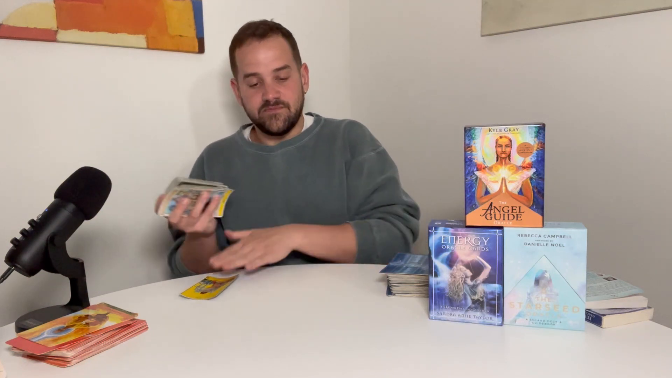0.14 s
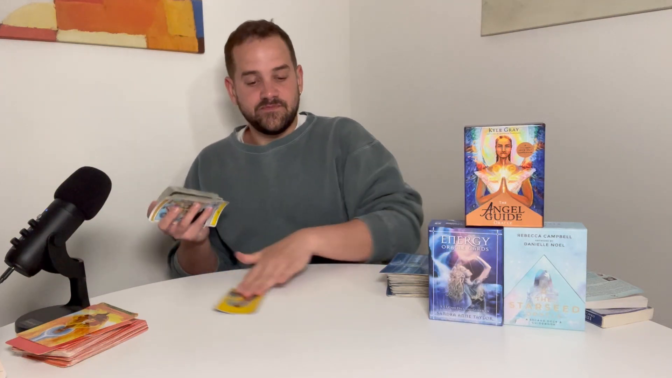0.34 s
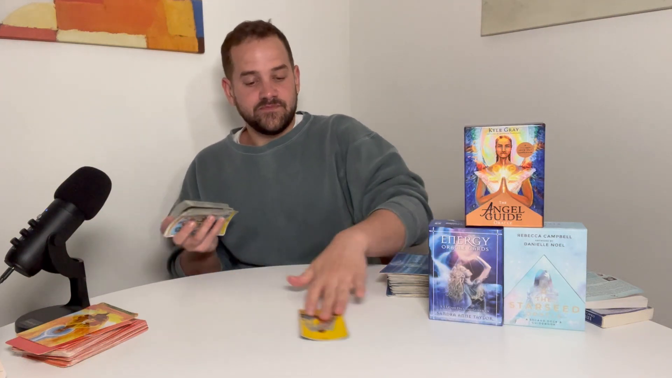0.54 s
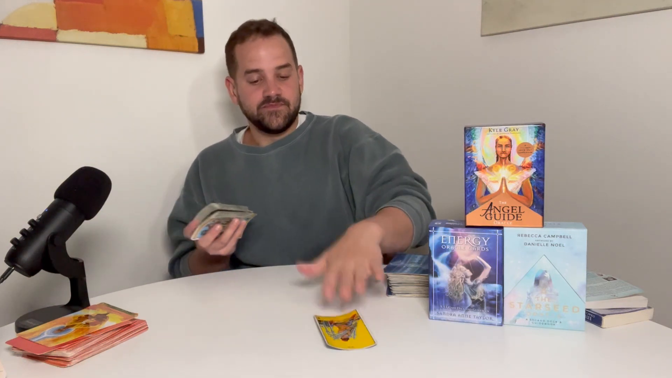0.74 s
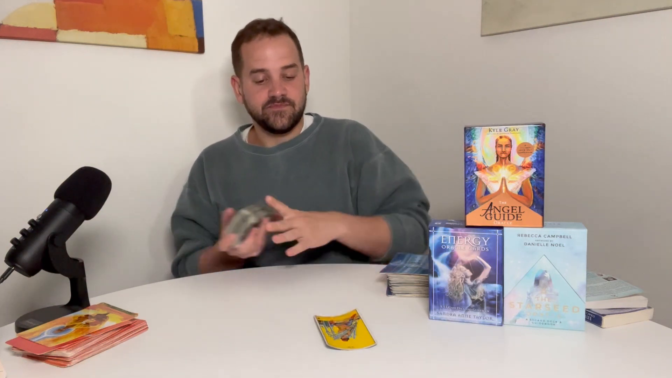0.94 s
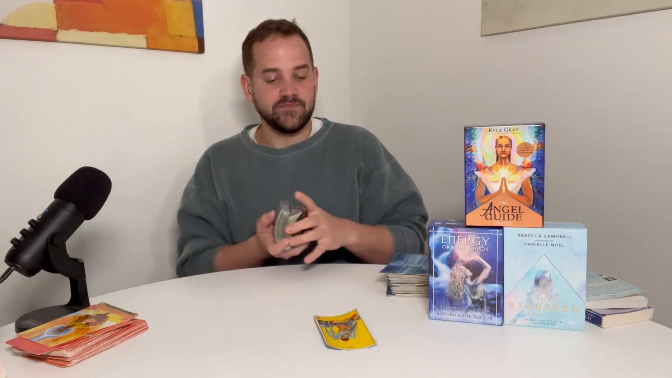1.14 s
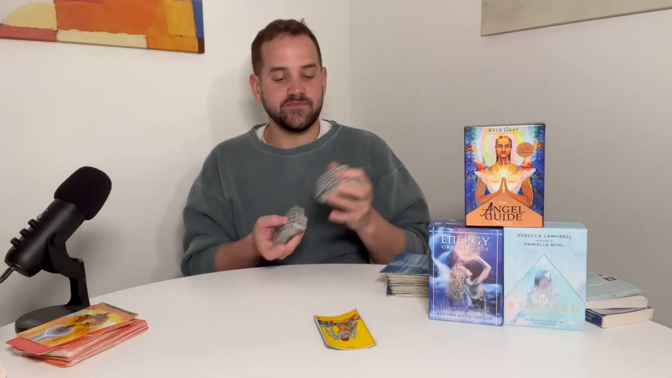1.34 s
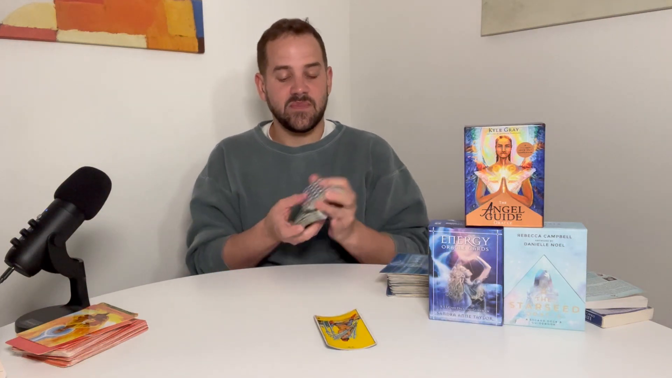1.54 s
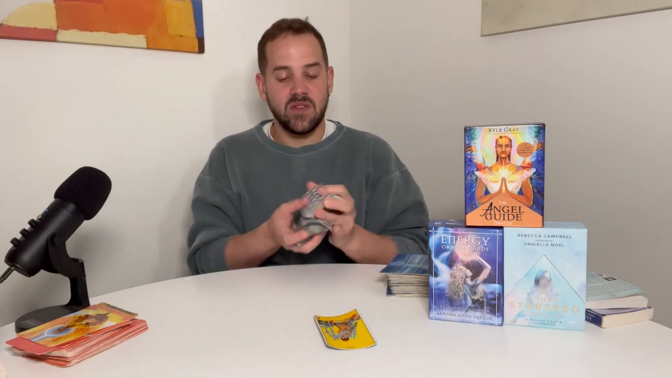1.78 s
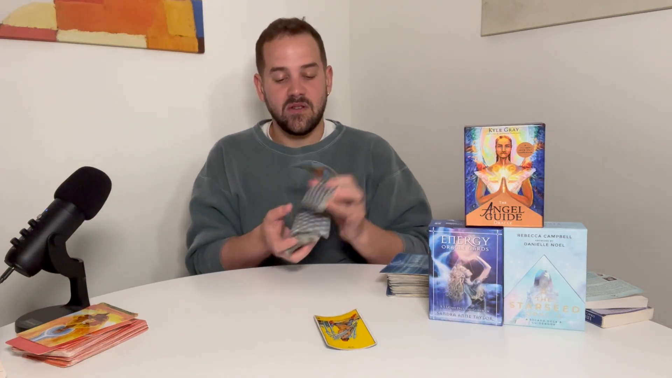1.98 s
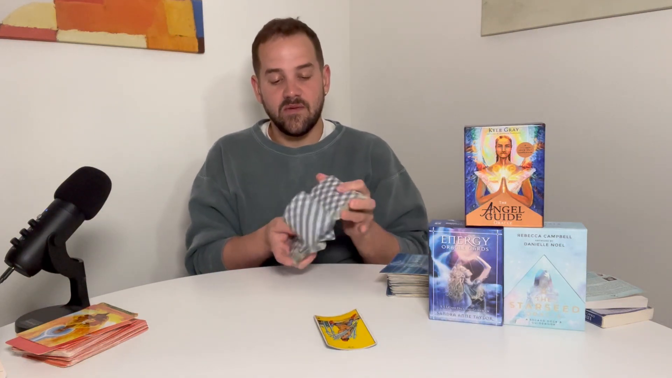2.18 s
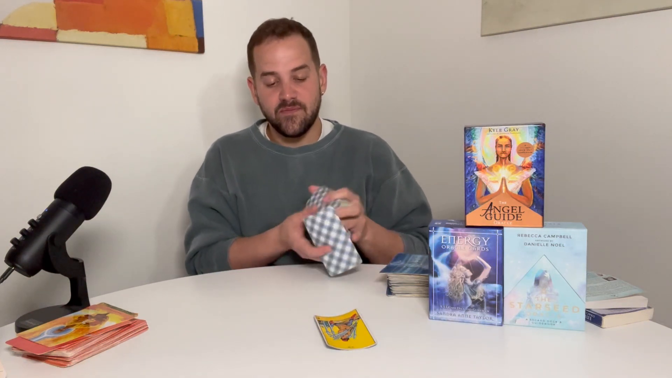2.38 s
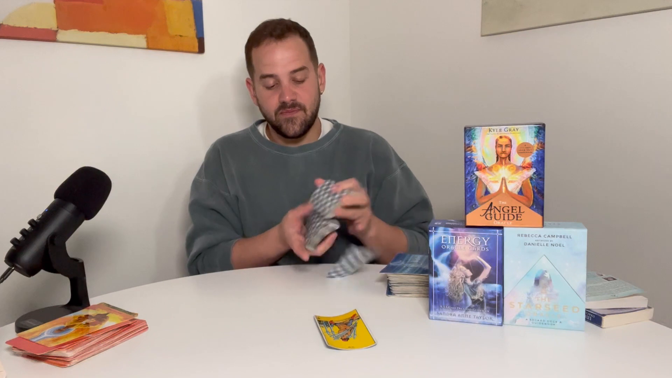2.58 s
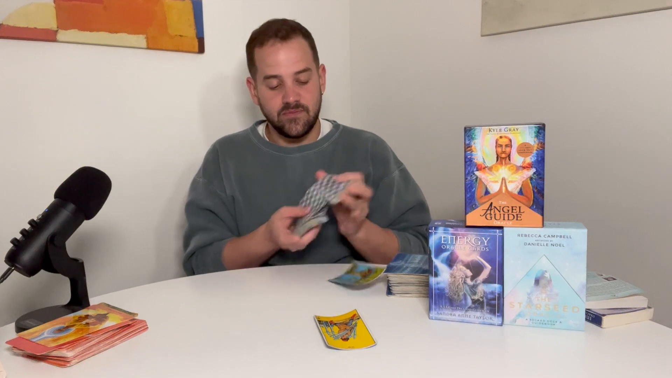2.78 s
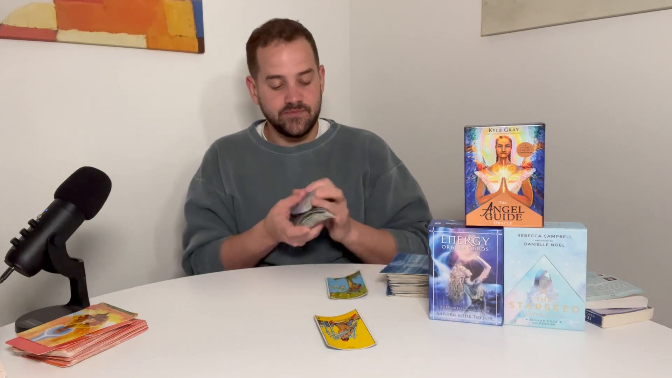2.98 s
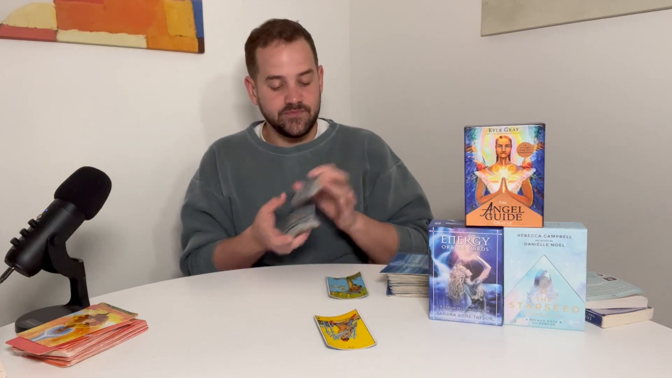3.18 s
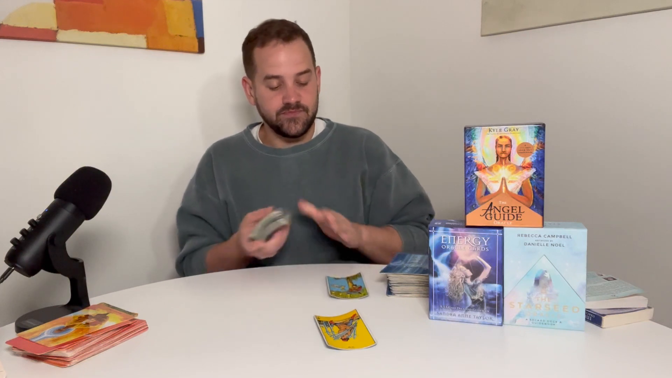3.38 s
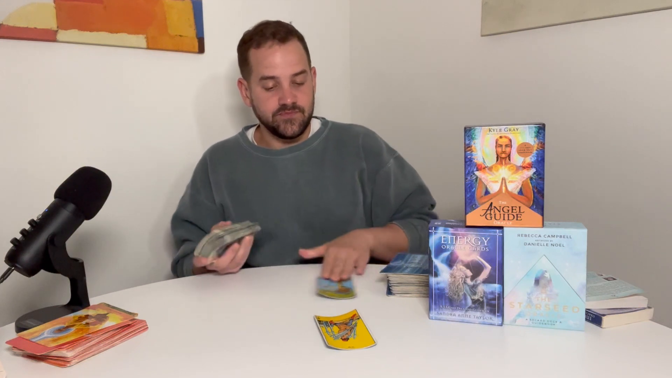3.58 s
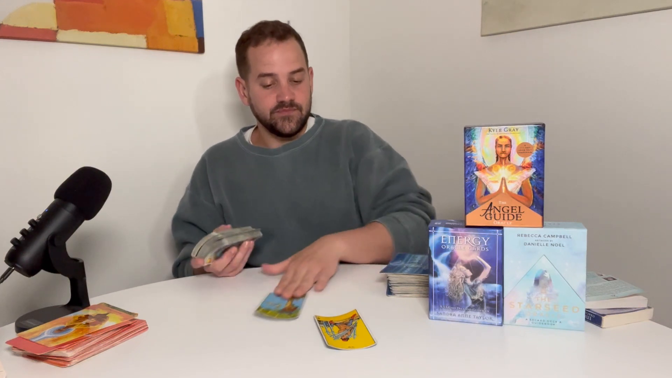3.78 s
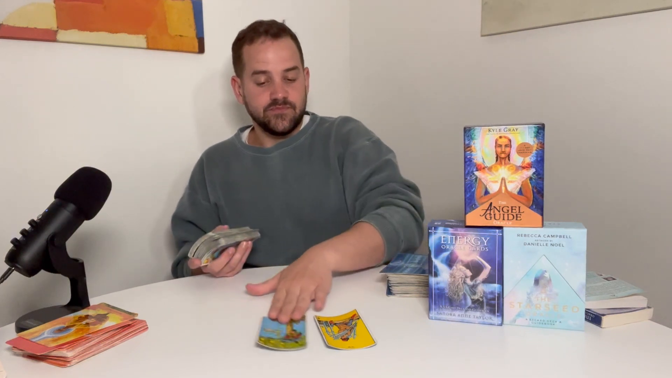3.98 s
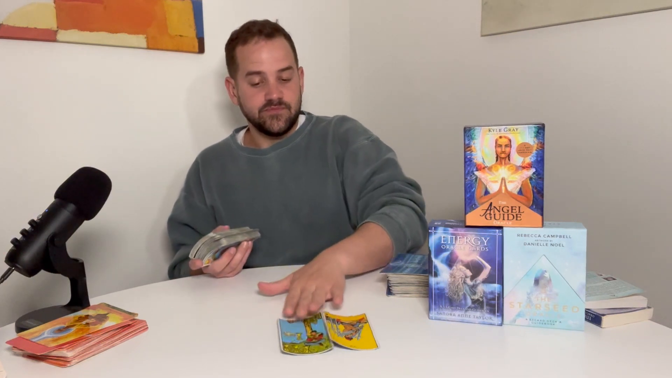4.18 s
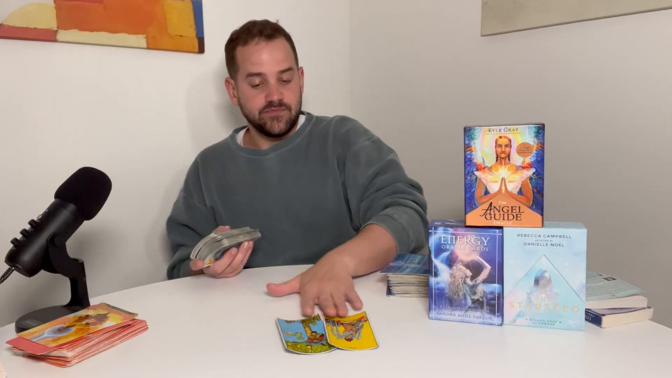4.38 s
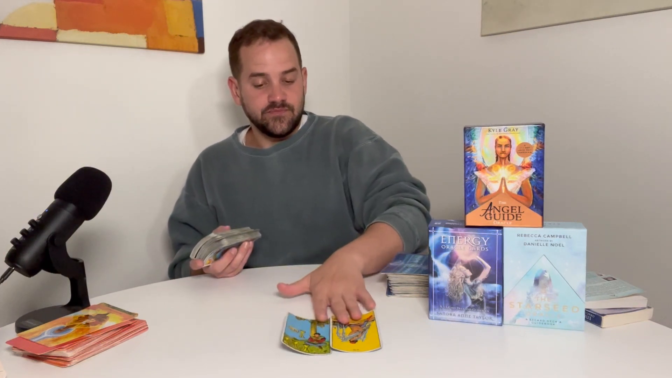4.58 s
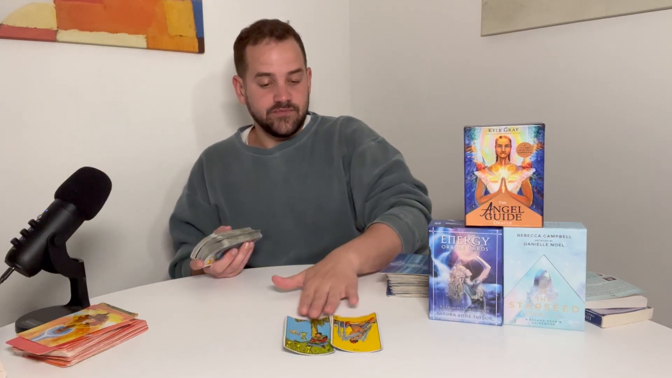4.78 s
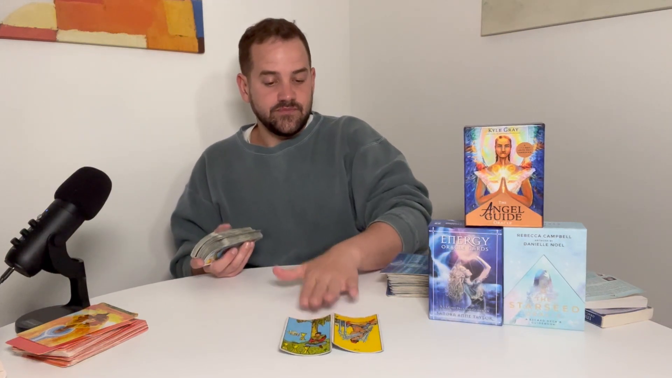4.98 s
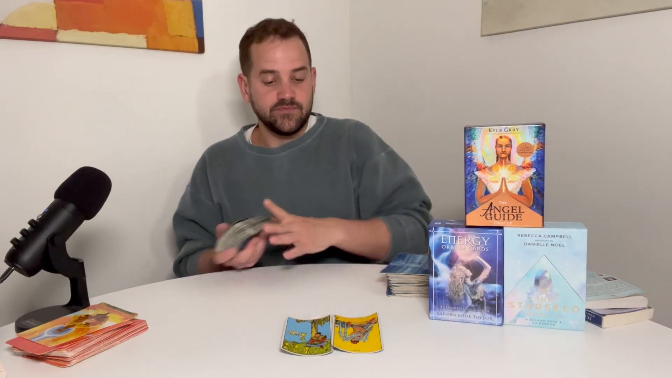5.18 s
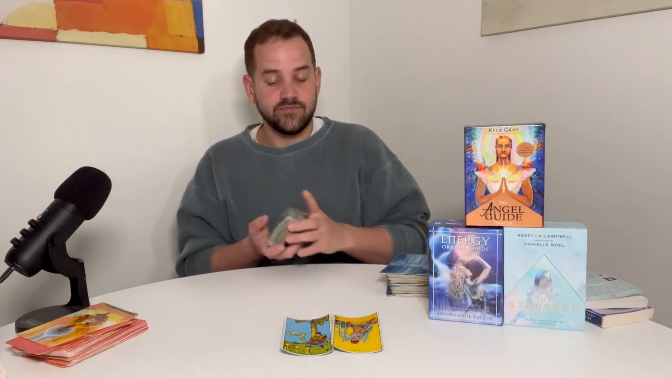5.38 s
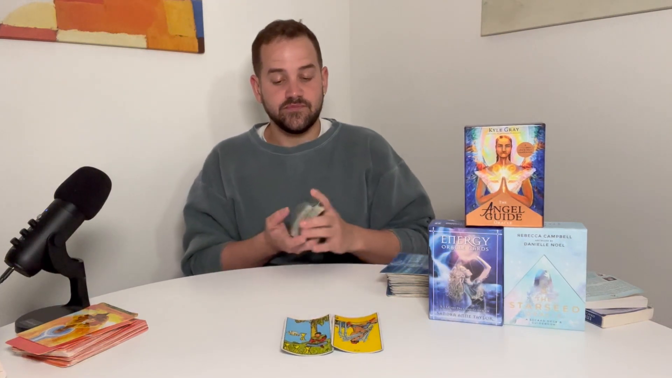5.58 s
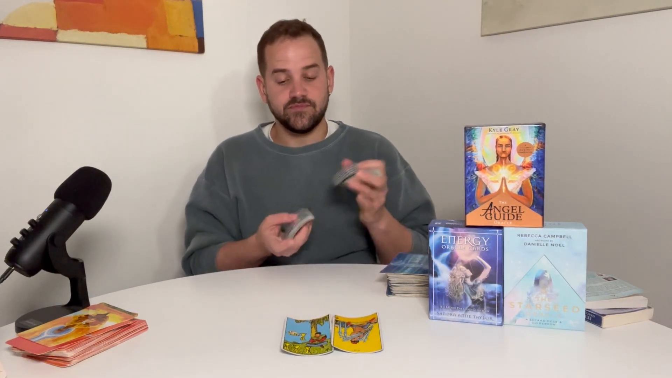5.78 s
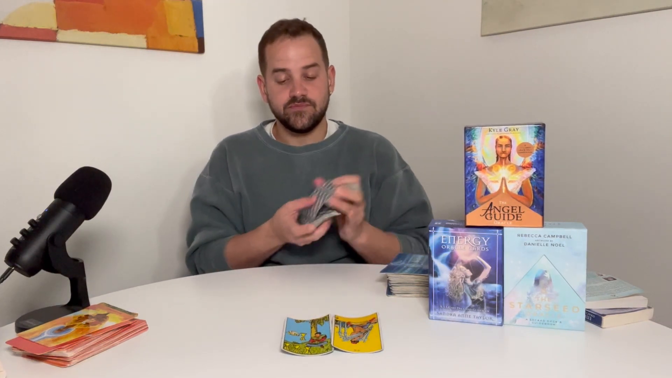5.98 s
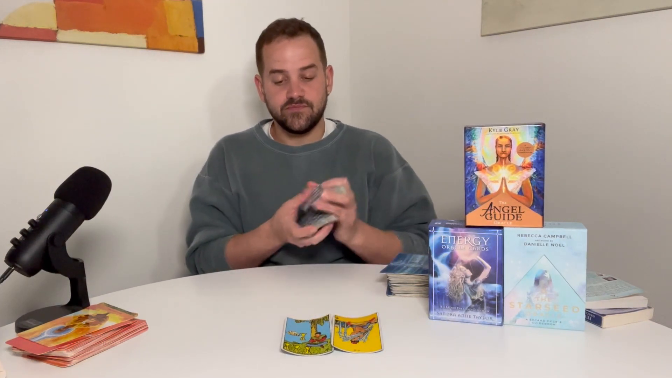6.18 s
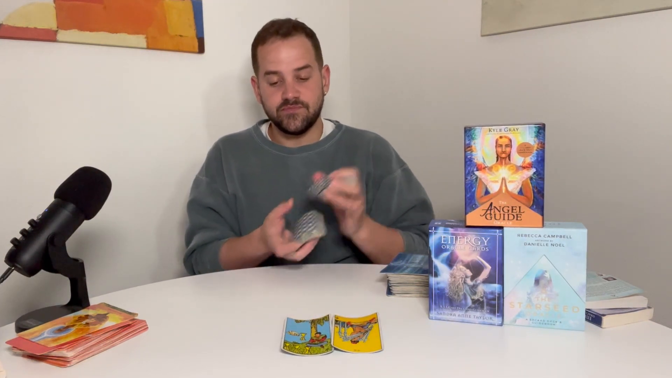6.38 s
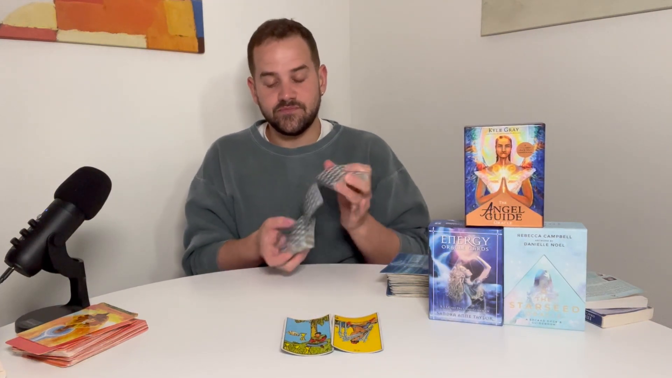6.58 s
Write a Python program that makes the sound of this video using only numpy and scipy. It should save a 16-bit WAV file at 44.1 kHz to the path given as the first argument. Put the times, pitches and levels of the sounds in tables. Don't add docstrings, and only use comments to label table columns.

```python
import sys
import numpy as np
from scipy import signal
from scipy.io import wavfile
from scipy.ndimage import uniform_filter1d

SR = 44100
rng = np.random.default_rng(int(sys.argv[2]) if len(sys.argv) > 2 else 0)


def voltage_ratio(decibels):
    exponent = np.asarray(decibels, float) / 20
    return 10 ** exponent


def store_pcm(level_fs):
    pcm = np.round(np.clip(level_fs, -1, 1) * 32767).astype(np.int16)
    wavfile.write(sys.argv[1], SR, np.atleast_2d(pcm).T)


N = 292824

# frequency in Hz, level in dB per Hz.
AIR = [(26, -36.5), (45, 0.5), (118, -1), (193, -7.5), (470, -5), (617, -16), (734, -17), (1430, -22),
       (1620, -18.5), (1880, -23.5), (12600, -33.5), (15300, -44.5), (16500, -59.5)]
AIR_DB = -58
# frequency in Hz, level in dB.
HUM = [(118.4, -62.5), (177.6, -75.5), (236.9, -78.5), (387.6, -71), (479.1, -76), (737.5, -73.5)]
# time in seconds, pitch in Hz, level in dB.
WAIL = [
    (3.8, 1220, -73),
    (4.0, 1380, -70),
    (4.2, 1540, -69),
    (4.45, 1640, -69),
    (4.8, 1675, -70),
    (5.24, 1665, -68),
    (5.45, 1480, -66),
    (5.7, 1340, -68),
    (5.9, 1220, -71),
]

# frequency in Hz, level in dB per Hz.
HISS = [(880, -40), (1500, -19), (2450, -14.5), (3090, -5.5), (4260, -7.5), (7620, -2), (8770, -6.5),
        (15100, -15), (16000, -28.5), (16500, -43)]
# frequency in Hz, level in dB per Hz.
HOLLOW = [(180, -33.5), (300, -2.5), (477, 2.5), (704, -18.5), (893, -6.5), (1180, -6), (1590, -6),
          (1850, -7), (3210, -9), (4170, -12), (6000, -19.5), (7800, -32.5), (13200, -120)]
# time in seconds, resonance in Hz.
POCKET = [(0, 1400), (1.6, 1540), (1.85, 2054), (2.1, 2044), (2.3, 1710), (2.55, 3070), (3.08, 2750),
          (3.27, 3010), (3.36, 1880), (5.4, 1674), (6.3, 1620), (6.64, 1474)]
POCKET_DB, POCKET_WIDTH_HZ = 1, 60
# time in seconds, hollow level in dB.
FIDGET = [(0, -56), (0.3, -57), (0.75, -64.5), (1.45, -66), (1.93, -47.5), (2.2, -51), (2.7, -55),
          (3.2, -72), (3.36, -68), (4.2, -74.5), (5.2, -82), (5.8, -60.5), (6.15, -60), (6.35, -56),
          (6.64, -54)]
FIDGET_HISS_DB = -17
# time in seconds, speed as hiss in dB.
PUSHES = [
    [(0.185, -62), (0.204, -44.5), (0.259, -35.5), (0.38, -37), (0.445, -30.5), (0.51, -42), (0.651, -54.5),
     (0.74, -72)],
    [(3.5, -62), (3.565, -49), (3.583, -43.5), (3.656, -39), (3.75, -44.5), (3.85, -40), (3.961, -44),
     (4.051, -52.5), (4.16, -55.5), (4.25, -85)],
]
PUSH_HOLLOW_DB = -19.5
# peak in seconds, hiss in dB, hollow in dB, seconds to fade 20 dB.
PULLS = [(1.062, -75, -52, 0.2), (1.317, -62, -56.5, 0.27), (1.615, -38, -31, 0.08),
         (1.756, -36.5, -34.5, 0.11), (1.846, -46, -42, -0.04), (1.99, -51, -46.5, -0.22),
         (2.45, -56, -52, .06), (2.6, -42.5, -47, 0.08), (2.824, -52, -42, 0.02), (5.989, -55, -42, .02),
         (3.095, -47, -43, 0.11), (4.572, -50.5, -55.5, 0.01), (5.509, -65.5, -60.5, 0.7),
         (5.725, -63, -52, 0.2), (5.942, -46, -47, .05), (6.28, -33, -35, 0.09),
         (6.525, -36.5, -39.5, 0.064), (6.624, -53, -36, 0.07)]
# peak in seconds, hiss in dB, hollow in dB, seconds to fade 20 dB.
FLICKS = [(2.632, -58, -42, .14), (1.499, -42, -44, .05), (5.086, -60, -55, .08), (0.986, -55, -64, 0.35),
          (1.523, -46, -47, .04), (2.02, -40, -32, -0.07), (2.263, -52, -35.5, 0.24),
          (2.323, -47, -41, 0.13), (2.953, -44, -40, 0.04), (3.193, -50, -50, 0.03),
          (3.228, -50, -36, 0.0436), (2.74, -49, -46.5, 0.23), (3.495, -43, -42, 0.03),
          (5.1, -67, -63, 0.5), (5.998, -42.5, -34.5, 0.1), (6.028, -56, -44.5, -0.2),
          (6.186, -36.5, -44, -0.29), (6.434, -48, -50, 0.06)]
# middle in seconds, hiss in dB, hollow in dB, half length in seconds.
NUDGES = [(3.03, -52, -52, .05), (1.675, -43, -60, .025), (1.97, -62, -47, .015), (2.19, -70, -49, .02),
          (2.435, -62, -47, .03), (5.965, -54, -60, .02), (2.806, -53, -40, .022), (3.08, -52, -39, .012),
          (6.49, -44, -52, .033), (2.75, -52, -60, .03), (1.83, -43, -48, .022), (0.8, -68, -72, .12),
          (0.93, -62, -68, 0.038), (2.06, -52, -43.5, 0.081), (3.255, -47, -42, 0.055),
          (4.51, -61.5, -65, .14), (5.275, -56, -60.5, 0.051), (5.67, -58.5, -58.5, 0.11)]
PULL_RISE, FLICK_RISE, LEAN_RISE = 0.71, 0.15, 0.14
DULL_DB, BRIGHT_DB, DULL_HZ = -72, -50, 9500

# peak in seconds, level in dB, seconds to fade 20 dB.
LEANS = [(0.24, -28, 0.4), (1.33, -49.5, 0.7), (1.63, -34, -0.4), (2.29, -35, 0.7), (2.7, -41, .12),
         (2.94, -48, .1), (3.09, -40.5, 0.3), (3.55, -25.5, 0.46), (3.81, -50, 0.23), (4.3, -48.5, .5),
         (4.9, -49.5, 1.3), (5.14, -40, 1.4), (5.4, -44.5, 1.5), (5.55, -40, 0.4), (5.9, -46, 1.1),
         (6.55, -52, -2)]
REST_DB = -65.5

# start in seconds, peak in dB, packet pitch in Hz, treble in dB.
THUDS = [(0.184, -43, 1490, 7), (1.528, -29, 1340, -17), (1.5733, -29, 1290, -14.5),
         (1.5998, -41, 1090, -6), (1.6135, -16, 2600, -18), (1.6473, -14, 2530, 10),
         (1.7244, -19.5, 3380, -17), (1.745, -31, 2140, 14.5), (1.8443, -22.5, 2020, 2.5),
         (1.9941, -24.5, 3130, -2), (2.0105, -18, 1620, -9), (2.143, -34.5, 1810, -12),
         (2.2564, -9.5, 3000, -30), (2.4125, -25, 1160, -34), (2.8355, -17, 1000, -38),
         (2.9035, -28.5, 1060, -5), (3.071, -31, 2410, -13), (3.1903, -31, 1285, 1), (3.5036, -32, 3880, 6),
         (5.9318, -32, 1324, -8.5), (5.9455, -28, 3160, 0), (6.1801, -32.5, 1750, -1),
         (6.25, -13.5, 1540, -4.5), (6.257, -6.5, 1460, -14), (6.2627, -17.5, 1440, -17),
         (6.2784, -8.5, 1580, -16), (6.5229, -13, 2580, 7.5), (6.5322, -8.5, 1400, -1)]
# start in seconds, peak in dB, pitch in Hz, treble in dB.
CLAPS = [(0.2009, -24.5, 4130, 6.5), (1.0673, -37, 1720, -17), (1.4985, -25, 1660, 0),
         (1.6216, -1, 1467, -6.5), (1.6532, -19, 1450, 1), (1.7425, -16, 2130, -22),
         (1.7552, -6.5, 3220, 4.5), (1.7628, -11.5, 1460, -23), (1.8495, -21, 2070, -25),
         (2.0148, -5.5, 4030, 5), (2.098, -33, 1570, 4.5), (2.2397, -41, 2990, 1), (2.318, -14, 1560, -19),
         (2.5564, -43, 3100, -17), (2.9594, -22.5, 1700, -17), (2.9808, -41, 3260, -11),
         (3.0223, -42, 1720, -12), (3.2207, -31, 2780, -1), (4.2409, -47.5, 2650, 2.5),
         (4.8066, -50, 1680, 4.5), (4.9761, -47.5, 3130, 4.5), (5.0864, -43, 1410, 3),
         (5.4798, -38.5, 1760, -0.5), (5.6982, -41, 1720, -10), (5.721, -32, 1690, 0),
         (6.0185, -13, 2950, -20), (6.028, -16, 3230, -2), (6.1934, -24.5, 3060, -0.5),
         (6.4427, -33, 1400, -3)]
# start in seconds, peak in dB, pitch in Hz, treble in dB.
CLICKS = [(0.9767, -32.5, 3440, -30), (1.0516, -34, 1780, 6), (1.301, -32, 3800, 1.5),
          (1.3115, -35, 2830, -26), (1.3215, -30.5, 1180, -6), (1.5209, -22, 3400, 0),
          (1.6295, -18, 1430, -18), (1.7501, -12, 1490, 1), (2.0294, -17, 1700, -23),
          (2.1744, -30.5, 1820, -17), (2.2085, -33.5, 3660, -9), (2.6142, -23, 1820, -10),
          (2.626, -15, 3070, -13), (2.7395, -37, 1570, -11), (2.7984, -38, 2900, -14),
          (2.8237, -26, 2700, -9), (3.0805, -19.5, 2880, -30), (3.0956, -18.5, 1740, 1),
          (3.8085, -45, 3210, 23), (5.5057, -44, 1320, -4), (5.6673, -35, 1750, 1), (5.9396, -22, 2600, -3),
          (5.992, -3.5, 2400, -14), (5.9989, -21.5, 1480, -16), (6.2689, -5.5, 1550, -18),
          (6.2846, -10.5, 1670, 7.5), (6.5089, -11.5, 1400, -7), (6.6206, -15.5, 1440, -3)]
# start in seconds, peak in dB, pitch in Hz, treble in dB.
TICKS = [(1.5915, -32, 4000, 3), (1.619, -14, 2600, -6), (1.9765, -42, 3500, 2), (2.2548, -8, 1900, -20),
         (2.3148, -33, 3500, 2), (2.387, -44, 4000, 6), (2.4535, -38, 2400, 2), (2.468, -48, 4000, 3),
         (2.5555, -38, 3070, 2), (2.569, -42, 3100, 2), (2.5925, -34, 4000, 6), (2.6095, -30, 2800, -3),
         (2.636, -29, 3300, 0), (2.678, -38, 3000, 6), (2.7395, -35, 2500, -3), (2.8385, -17, 1050, 3),
         (2.846, -34, 2500, -2), (2.9495, -36, 3500, 5), (2.982, -38, 3200, 4), (3.0755, -27, 2800, -6),
         (3.191, -30, 1350, 0), (3.287, -36, 3000, 3), (3.4925, -34, 3500, 3), (5.924, -42, 3000, 2),
         (5.946, -25, 3100, -5), (5.9535, -34, 3500, 3), (5.9885, -28, 2500, -8), (6.022, -20, 2900, -4),
         (6.188, -33, 3500, 4), (6.2725, -14, 3000, -2), (6.292, -16, 1650, -2), (6.431, -40, 3000, 3),
         (6.4475, -36, 3000, 3), (6.5275, -22, 1500, -6), (6.616, -28, 1500, -4), (6.633, -30, 1450, -4)]
# low body in dB, t60 in seconds.
THUD = (-3.5, .031)
CLAP = (-12, 0.025)
CLICK = (-25.5, .022)
TICK = (-30, .008)
FIRST = 2.5
# frequency in Hz, width in Hz, level in dB.
DECK = [(447, 206, -4), (768, 230, -4.5), (1400, 98, -2), (1620, 33, -8), (2750, 1200, -9),
        (3460, 130, -20)]
# frequency in Hz, t60 in seconds.
ROOM = [(200, 0.4), (1500, .25), (5000, 0.19), (14000, 0.11)]

# start in seconds, peak in dB,
# share of the panel's upper modes in dB, share of the stand's sway in dB.
KNOCKS = [(0.193, -34, -6, -1.5), (1.619, -42, 5, -23), (1.736, -30, 14, -25), (2.014, -55, 0, -19),
          (2.255, -16, 6.5, -27), (2.411, -20, 6, -27), (2.617, -34.5, 0, -11), (2.835, -38, 1, -27),
          (2.901, -30, 4, -21), (3.093, -35.5, 9, -28), (3.498, -27, -10.5, -8), (3.761, -53.5, 9, 18.5),
          (4.208, -44.5, -3, -12.5), (5.083, -40, -2.5, 3), (5.342, -40, -5.5, -7.5),
          (5.989, -36, 8.5, -14), (6.254, -25.5, 26, -29), (6.507, -27.5, 10, -40)]
# frequency in Hz, level in dB, t60 in seconds.
TABLE = [(25, 9, 0.55), (38.5, -9.5, .4), (82.5, -1, 0.44), (116.9, -4, 0.31), (140.5, -1, 0.11),
         (165, -3, 0.17), (348.3, -11.5, 0.23), (494, -8.5, .1)]


def evened(x):
    return x / np.sqrt(np.mean(x ** 2) + 1e-20)


def peaked(x):
    return x / np.max(abs(x), axis=-1, keepdims=True)


def read(points, hz):
    f, value = np.transpose(points)
    return np.interp(np.log(hz + 1), np.log(f + 1), value)


def curve(rows, column):
    columns = np.transpose(rows)
    return np.interp(np.arange(N) / SR, columns[0], columns[column])


def add(mix, s, sound):
    part = mix[round(s * SR):][:len(sound)]
    part += sound[:len(part)]


def band(x, lo_hz, hi_hz):
    return signal.sosfilt(signal.butter(2, [lo_hz, hi_hz], "band", fs=SR, output="sos"), x)


def resonate(x, hz, width):
    turn = np.exp(2j * np.pi * np.cumsum(hz * np.ones(x.shape[-1])) / SR)
    r = np.exp(-np.pi * width / SR)
    return 2 * (turn * signal.lfilter([1 - r], [1, -r], x / turn + 1e-18)).real


def noise(spectrum, patchy_db, flicker_db, size):
    frames, hz = 4 * N // size + 5, np.fft.rfftfreq(size, 1 / SR)
    a, b, patches = rng.standard_normal((frames, len(hz), 3)).T
    patches = uniform_filter1d(patches, size // 64, 0)
    patches = evened(uniform_filter1d(patches, 8192 // size, 1))
    flicker = evened(uniform_filter1d(rng.standard_normal(frames), 3))
    level_db = read(spectrum, hz)[:, None] + patchy_db * patches + flicker_db * flicker
    z = (a + 1j * b) * voltage_ratio(level_db)
    return evened(signal.istft(z, nperseg=size, noverlap=3 * size // 4)[1][:N])


def milliseconds():
    return np.arange(N * 1000 // SR + 2) / 1000


def swells(rows, column, rise, count=1):
    rows = np.array(rows)
    late = (milliseconds() - rows[:, :1]) / np.maximum(rows[:, -1:], .01)
    drop_db = 20 * np.maximum(late, -late / rise) ** count
    return (voltage_ratio(rows[:, column:column + 1] - drop_db) ** 2).sum(0)


def steady(rows):
    s, db = np.transpose(rows)
    return voltage_ratio(np.interp(milliseconds(), s, db, left=-120, right=-120)) ** 2


def level(power):
    return np.interp(np.arange(N) / SR, np.arange(len(power)) / 1000, 10 * np.log10(power + 1e-12))


def background():
    air = voltage_ratio(AIR_DB + 1.0) * noise(AIR, patchy_db=2.4, flicker_db=0.45, size=2048)
    t = np.arange(N) / SR
    hum = np.zeros(N)
    for hz, db in HUM:
        waver = evened(resonate(rng.standard_normal(N), hz, 8))
        hum += voltage_ratio(db) * evened(np.sin(2 * np.pi * hz * t) + .6 * waver)
    pitch = curve(WAIL, column=1)
    blur = evened(resonate(resonate(rng.standard_normal(N), pitch, 50), pitch, 50))
    wail = evened(np.sin(2 * np.pi * np.cumsum(pitch) / SR) + 1.8 * blur)
    start, end = WAIL[0][0], WAIL[-1][0]
    fade = np.interp(t, [start - .3, start, end, end + 0.23], [0, 1, 1, 0])
    return air + hum + voltage_ratio(curve(WAIL, column=2) - .7) * fade * wail


def strokes(column):
    pulls, flicks = swells(PULLS, column, PULL_RISE), swells(FLICKS, column, FLICK_RISE)
    return pulls + flicks + swells(NUDGES, column, 1, count=4)


def effort():
    push, fidget = sum(steady(p) for p in PUSHES), steady(FIDGET)
    hiss = push + voltage_ratio(2 * FIDGET_HISS_DB) * fidget + strokes(column=1)
    hollow = voltage_ratio(2 * PUSH_HOLLOW_DB) * push + fidget + strokes(column=2)
    return level(hiss), level(hollow)


def flutter(per_s, spread_db):
    ticks = voltage_ratio(spread_db * np.minimum(rng.exponential(1, N), 4)) * (rng.random(N) < per_s / SR)
    return evened(1.9 + signal.lfilter([1], [1, -np.exp(-1 / (0.0018 * SR))], ticks))


def rubbing():
    hiss = noise(HISS, patchy_db=1.3, flicker_db=1.2, size=256)
    hollow = noise(HOLLOW, patchy_db=1.6, flicker_db=1.0, size=256)
    pocket = curve(POCKET, column=1)
    hollow = evened(hollow + 1.6 * resonate(hollow, pocket, 200) + 1.2 * resonate(hollow, 1.8 * pocket, 300))
    catch = flutter(per_s=400, spread_db=1.2)
    hiss_db, hollow_db = effort()
    dull = signal.sosfiltfilt(signal.butter(4, DULL_HZ, fs=SR, output="sos"), hiss)
    sparkle = np.clip((hiss_db - DULL_DB) / (BRIGHT_DB - DULL_DB), .4, 1)
    hiss = dull + sparkle * (hiss - dull)
    edges = np.clip((hollow_db - hiss_db + 6.0) / 8, .2, .6)
    return (1 - edges + edges * catch) * (voltage_ratio(hiss_db) * hiss + voltage_ratio(hollow_db) * hollow)


def sway():
    rumble = evened(band(band(rng.standard_normal(N), 4.1, 45), 5.9, 60))
    lean = swells(LEANS, column=1, rise=LEAN_RISE) + voltage_ratio(2 * REST_DB)
    return voltage_ratio(level(lean) - 7.5) * rumble


def snaps(*kinds):
    out, t = np.zeros(N), np.arange(-128, 2048) / SR
    rows = [row + kind for events, kind in kinds for row in events]
    s, db, hz, treble_db, low_db, t60 = np.transpose(rows)[:, :, None]
    burst = rng.standard_normal((len(s), len(t))) - FIRST * (t == 0)
    closing = np.exp(np.minimum(t, 0) / 0.00035)
    decay = voltage_ratio(-60 * np.maximum(t, 0) / t60)
    blow = closing * (0.44 * np.exp(-abs(t) / 0.00052) + 0.59 * decay)
    contact = burst * blow
    mids = band(contact, 500, 5000)
    deck = sum(voltage_ratio(d) * resonate(mids, f, w) for f, w, d in DECK[2:])
    packet = np.array([resonate(m, f, .22 * f) for m, f in zip(mids, hz[:, 0])])
    body = peaked(peaked(packet) + .4 * peaked(deck) + .9 * peaked(mids))
    crack = burst * closing ** 2 * (np.exp(-abs(t) / 0.00026) + 0.42 * blow)
    treble = peaked(band(crack, 4500, 8500) + .28 * band(crack, 5000, 14000))
    low = peaked(band(sum(voltage_ratio(d) * resonate(contact, f, w) for f, w, d in DECK[:2]), 150, 970))
    sounds = voltage_ratio(db) * (body + voltage_ratio(treble_db) * treble + voltage_ratio(low_db) * low)
    for at, sound in zip(s[:, 0], sounds):
        add(out, at + t[0], sound)
    return out


def room(x):
    taps = np.zeros(SR // 2)
    at = np.arange(200, len(taps) - 20, 20)
    taps[at + rng.integers(0, 20, len(at))] = rng.choice([-1., 1.], len(at))
    hz, t, z = signal.stft(taps, SR, nperseg=256)
    tail = signal.istft(z * voltage_ratio(-60 * t / read(ROOM, hz)[:, None]), SR, nperseg=256)[1]
    return signal.fftconvolve(x, tail / np.linalg.norm(tail))[:N]


def knocks():
    out, t = np.zeros(N), np.arange(SR) / SR
    spread = rng.standard_normal((len(KNOCKS), len(TABLE)))
    hz, mode_db, t60 = np.transpose(TABLE)[:, :, None]
    onset = 1 - np.exp(-t * hz / 0.31)
    rings = voltage_ratio(mode_db - 60 * t / t60) * np.sin(2 * np.pi * hz * t) * onset
    for (s, db, upper_db, sway_db), chance in zip(KNOCKS, spread):
        place_db = 1.04 * chance[:, None] + upper_db * (hz > 125)
        modes = voltage_ratio(place_db) * rings
        panel, stand = peaked(modes[2:].sum(0)), peaked(modes[:2].sum(0))
        add(out, s, voltage_ratio(db) * (panel + voltage_ratio(sway_db) * stand))
    return out


def scene():
    claps = snaps((THUDS, THUD), (CLAPS, CLAP), (CLICKS, CLICK))
    claps = claps + voltage_ratio(POCKET_DB) * resonate(claps, curve(POCKET, column=1), POCKET_WIDTH_HZ)
    ticks = snaps((TICKS, TICK))
    mix = background() + rubbing() + sway() + claps + voltage_ratio(-12.5) * room(claps) + knocks() + ticks
    return mix[None]


def band_limit(x):
    return signal.sosfilt(signal.butter(12, 16660, fs=SR, output="sos"), x)


def record(dry):
    edge = signal.firwin(255, 15900, window=("kaiser", 4), fs=SR)
    mix = np.clip(signal.oaconvolve(dry, edge[None], "same"), -1, 1)
    return band_limit(mix)


dry = scene()
out = record(dry)
store_pcm(out)
```